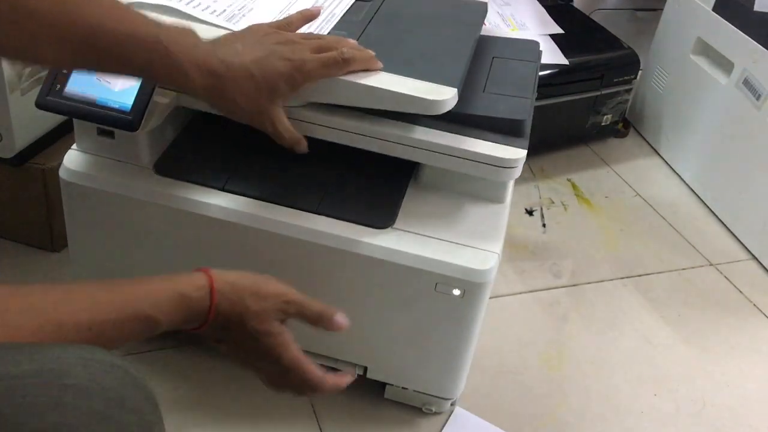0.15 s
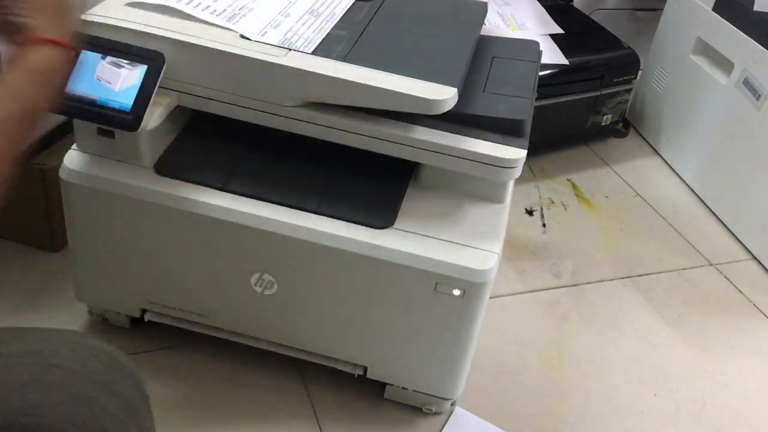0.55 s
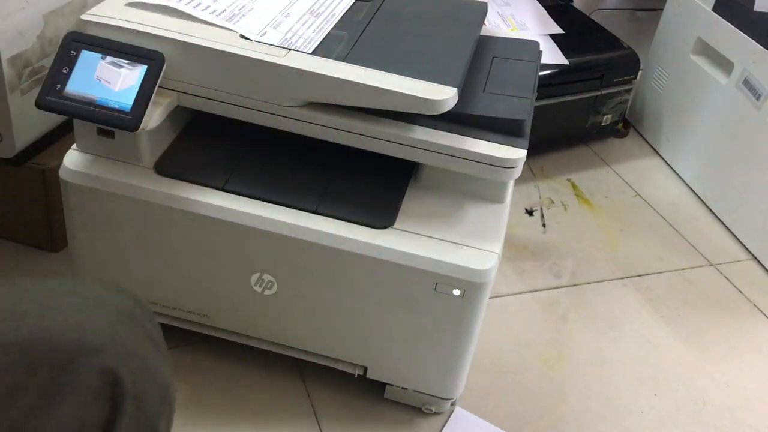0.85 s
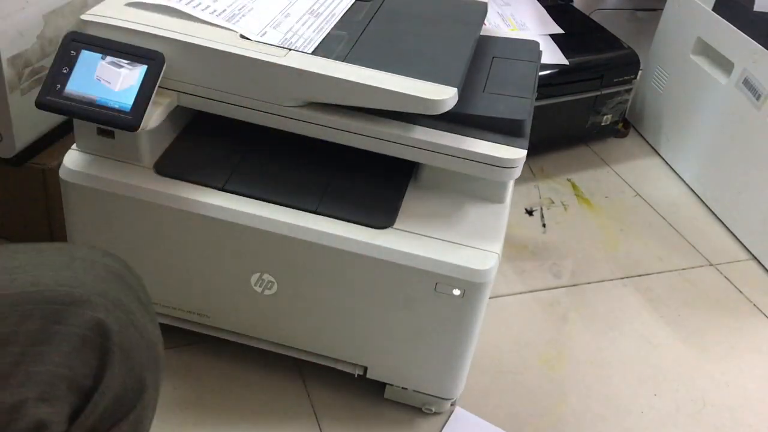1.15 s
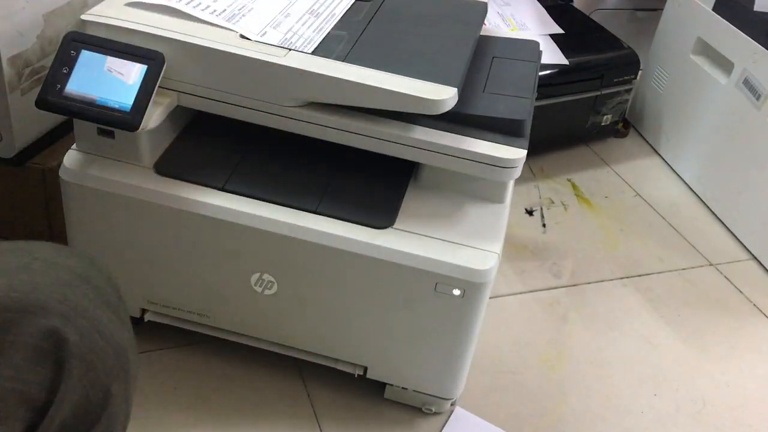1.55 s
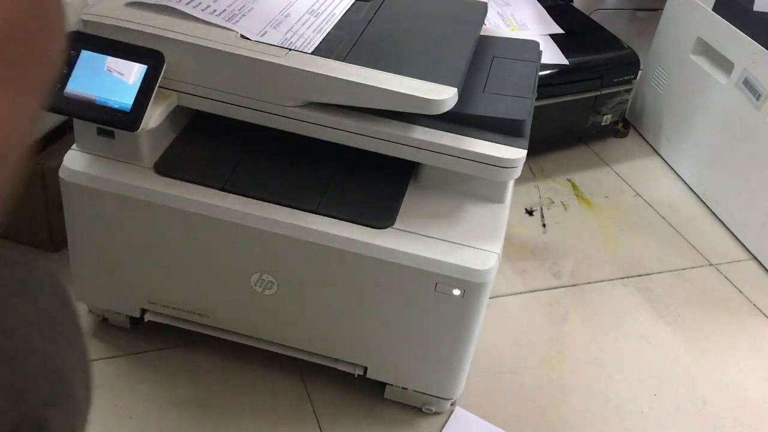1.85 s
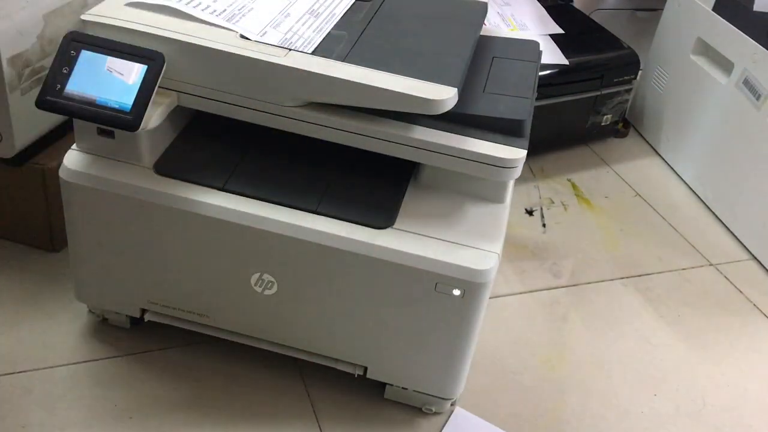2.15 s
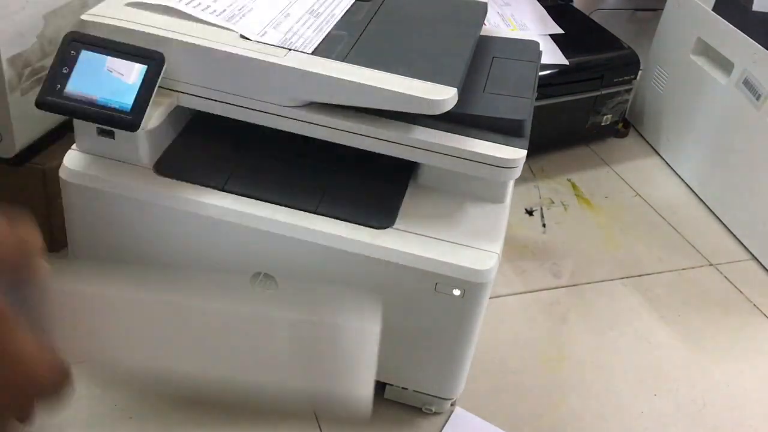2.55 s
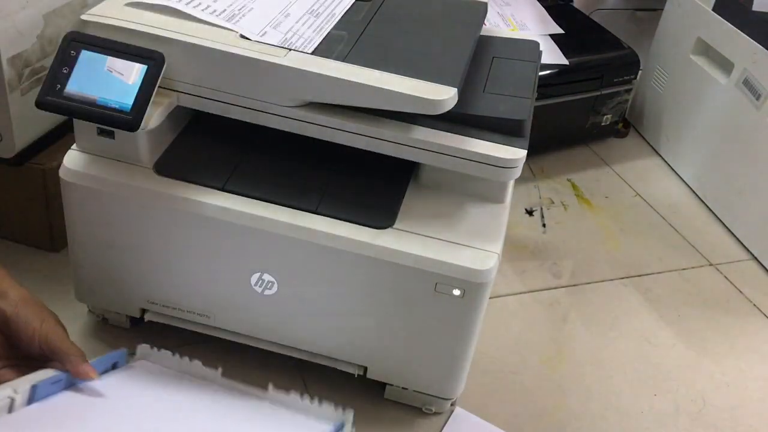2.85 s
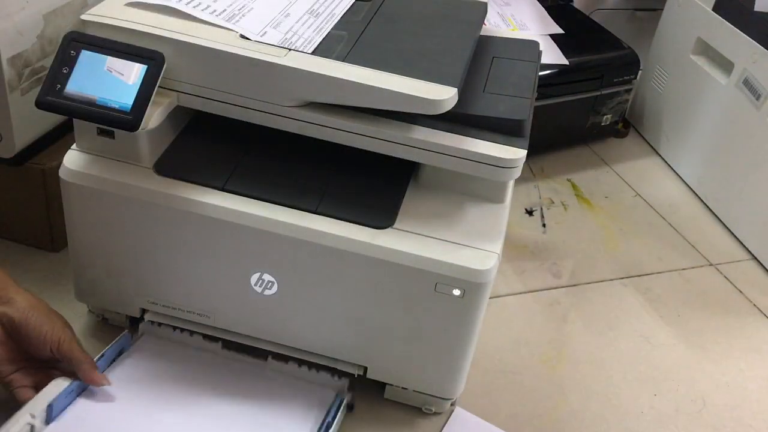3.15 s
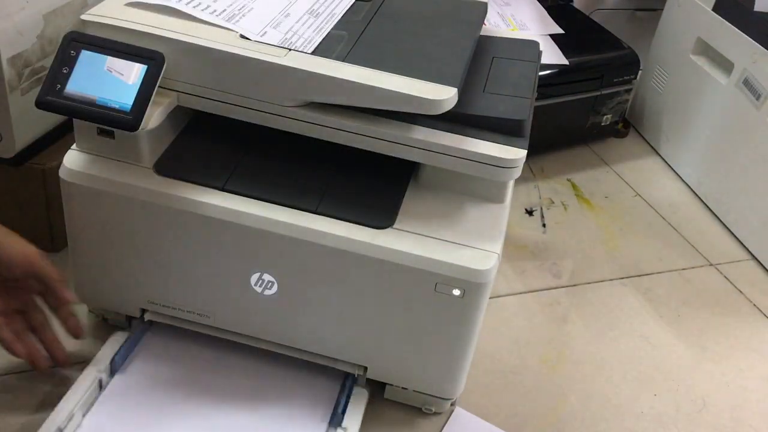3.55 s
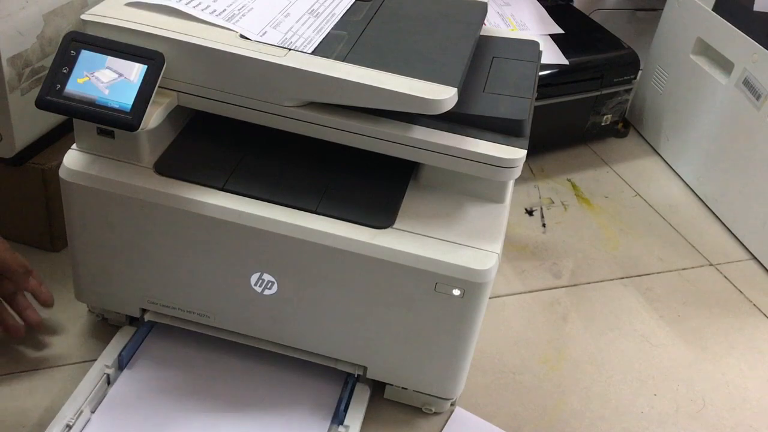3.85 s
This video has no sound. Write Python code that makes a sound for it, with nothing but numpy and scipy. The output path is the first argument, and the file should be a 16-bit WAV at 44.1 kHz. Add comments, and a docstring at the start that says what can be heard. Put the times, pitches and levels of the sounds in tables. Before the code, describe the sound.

Sharp clacks and rattling as a plastic paper tray slides into an office printer.

```python
"""A plastic paper tray goes into an office printer, close to one microphone in a small, hard-floored room.
First the scanner lid drops shut. Clothes and paper rustle, and further off the tray is picked up with a
click. It clacks against the mouth of its slot, rattles and scrapes along the rails and knocks home: each
blow sets the plastic ringing, and the rubbing is a stream of tiny slips. Ventilation rumbles throughout."""
import sys
import numpy as np
from scipy import signal
from scipy.fft import rfft, irfft
from scipy.io import wavfile

SR = 44100
rng = np.random.default_rng(int(sys.argv[2]) if len(sys.argv) > 2 else 0)


def unload_audio(sound):
    """Save the sound as a 16-bit wav file, at the path given as the first command line argument."""
    columns = np.transpose(np.atleast_2d(sound))
    # keep every value between -1 and 1, then stretch to whole-number steps
    steps = np.round(np.clip(columns, -1, 1) * 32767)
    wavfile.write(sys.argv[1], SR, steps.astype(np.int16))


N = 176400
TIME = np.arange(N) / SR
HIT_TIME = TIME[:SR // 2]

# plastic parts knock together: (time [s], level [dB], body boost [dB], edge boost [dB], chatter [s],
# crack pitch [Hz], relative crack level [dB])
CONTACTS = [(0.0112, -25, -6, 4, 0.003, 2970, 11), (2.297, -42, 0, 2, 0.003, 4070, 13.5),
            (2.797, -41, 13, -10, 0.0047, 1390, 10), (2.821, -47, 7, -15, .005, 1360, 20.5),
            (2.8445, -29.5, -6, -18, 0.0027, 1660, 5), (2.9743, -6, -2, -0.5, 0.0021, 4370, 8.5),
            (3.1277, -19.5, 3.5, 4, 0.0025, 4036, 11.5), (3.221, -42.5, 13, 8, 0.0051, 1670, 15.5),
            (3.318, -30, 3, -2.5, 0.013, 1540, -11), (3.342, -31.5, 14.5, -4, 0.0052, 1520, 9),
            (3.416, -29.5, 9.5, 7, 0.0033, 1190, -1), (3.45, -27.5, 8, -11, 0.0062, 1220, 5),
            (3.467, -29, 9, 3.5, 0.0081, 1580, 12.5), (3.494, -19.5, 3.5, -3.5, 0.0068, 1640, 7.5),
            (3.539, -20, 1.5, 1, 0.0046, 1270, 6), (3.561, -29.5, 7, -9, 0.0035, 1640, 10),
            (3.623, -18, 5.5, 0, 0.0049, 1052, 8.5), (3.649, -15.5, -4.5, 4.5, 0.0016, 1250, 2),
            (3.677, -17.5, 6, -2, 0.012, 1786, -4), (3.762, -33.5, 5, 2, 0.0012, 6750, 16),
            (3.7735, -17, 3, 0.5, 0.0065, 1400, 3), (3.838, -26, 4, 16, 0.0023, 1090, 9),
            (3.8414, -7.5, -0.5, 1.5, 0.003, 3700, 11.5)]
# spectrum of brushing cloth and paper: (frequency [Hz], level [dB])
CLOTH_SPECTRUM = [(400, -2), (2500, 0), (4200, 0.5), (6500, -3.5), (12000, -8), (14500, -11), (16000, -15)]
# spectrum of gritty rubbing: (frequency [Hz], level [dB])
SCRAPE_SPECTRUM = [(180, -17), (300, -4), (801, -7), (1150, 3), (1360, -6), (1680, 0), (2100, -4),
                   (4590, -9.5), (5000, -15.5), (16000, -29.5)]


def from_db(db):
    """Decibels to gain."""
    return 10 ** (np.asarray(db) / 20)


def rms_one(x):
    """Scale to rms 1."""
    return x / np.sqrt(np.mean(x ** 2) + 1e-20)


def at_hz(points, hz):
    """Read a table on a log-frequency axis."""
    f, value = np.transpose(points)
    return np.interp(np.log(np.maximum(hz, 1)), np.log(f), value)


def level_curve(rows):
    """Gain over time from rows of (time [s], level [dB])."""
    return from_db(np.interp(TIME, *np.transpose(rows)))


def swell(s, db, half_s):
    """Bell-shaped rise and fall in level around time s."""
    return from_db(db) * np.exp(-((TIME - s) / half_s) ** 2)


def colour(x, spectrum):
    """Give a signal a spectrum; rms 1."""
    hz = np.arange(len(x) // 2 + 1) * SR / len(x)
    return rms_one(irfft(rfft(x) * from_db(at_hz(spectrum, hz)), len(x)))


def bell(x, hz, db, width=0.92):
    """Boost or cut round one frequency; width is half the bandwidth over that frequency."""
    a, w = from_db(db / 2), 2 * np.pi * hz / SR
    k = np.sin(w) * width
    return signal.lfilter([1 + k * a, -2 * np.cos(w), 1 - k * a], [1 + k / a, -2 * np.cos(w), 1 - k / a], x)


def add(out, s, sound):
    """Mix a sound in at time s."""
    i = max(int(s * SR), 0)
    out[i:i + len(sound)] += sound[:N - i]


def blow(chatter_s, t60, attack_s=0.00025):
    """Envelope of a blow: quick rise, held while the contact chatters, then ringing out."""
    rise = 1 - np.exp(-HIT_TIME / attack_s)
    return rise * from_db(-60 * np.maximum(HIT_TIME - chatter_s, 0) / t60)


def dense_ring(spectrum, chatter_s, t60):
    """Countless overlapping modes of a panel, struck together."""
    return colour(rng.standard_normal(len(HIT_TIME)), spectrum) * blow(chatter_s, t60)


def modal_ring(modes, chatter_s, spread_db):
    """Distinct modes, each struck with a strength of its own."""
    ring = 0
    for hz, db, t60 in modes:
        strength = from_db(db + spread_db * rng.standard_normal())
        ring += strength * np.sin(2 * np.pi * (hz * HIT_TIME + rng.random())) * blow(chatter_s, t60)
    return ring


def friction(spectrum, per_s, spread_db):
    """Tiny random slips of uneven size, coloured by the rubbed surface."""
    slips = (rng.random(N) < per_s / SR) * rng.choice([-1, 1], N)
    sizes = from_db(spread_db * np.minimum(rng.exponential(1, N), 4))
    return colour(slips * sizes, spectrum)


def ventilation(rumble_hz=73, width_hz=11.6):
    """Room tone: steady air noise, with a low resonant rumble that swells and sinks."""
    # spectrum of the moving air: (frequency [Hz], level [dB])
    air_spectrum = [(22, -19), (32, -14), (45, -1.5), (70, -4.5), (105, -5), (150, -9), (200, -8.5),
                    (265, -12.5), (310, -17), (390, -13.5), (500, -20.5), (1100, -19.5), (1800, -24.5),
                    (4800, -37.5), (5600, -36), (10300, -47.5), (16000, -52)]
    # course of the rumble: (time [s], level [dB])
    rumble_levels = [(0, -52), (.7, -56), (2.3, -56.5), (2.6, -58.5), (2.72, -44), (2.95, -53), (4, -57)]
    resonance = signal.iirpeak(rumble_hz, rumble_hz / width_hz, fs=SR)
    rumble = signal.lfilter(*resonance, rng.standard_normal(N + SR))[SR:]  # a second to build up
    air = from_db(-50.5) * colour(rng.standard_normal(N), air_spectrum)
    return air + level_curve(rumble_levels) * rms_one(rumble)


def scanner_lid():
    """The lid drops shut in two quick blows; the first also sets its distinct modes ringing."""
    # the lid lands and settles: (time [s], level [dB])
    hits = [(0.0, -23), (.011, -25)]
    # its mass of overlapping modes: (frequency [Hz], level [dB])
    spectrum = [(30, -16), (72, -6), (130, -10), (220, -2.5), (300, -4.5), (400, 2.5), (650, -2.5),
                (1100, -2.5), (1900, -5), (3100, -6.5), (4500, -14), (8000, -21.5), (13500, -29.5),
                (16000, -39)]
    # its distinct modes: (frequency [Hz], level [dB], t60 [s])
    modes = [(74.5, -0.5, 0.46), (121, -4, 0.21), (408, 7.5, .14), (866, -5, 0.15), (1151, -3, .1)]
    out = np.zeros(N)
    for s, db in hits:
        add(out, s, from_db(db) * dense_ring(spectrum, chatter_s=0.0013, t60=0.16))
    s, db = hits[0]
    add(out, s, from_db(db - 10.5) * modal_ring(modes, chatter_s=0.01, spread_db=3.5))
    return out


def rustle():
    """Sleeves, trousers and paper brush in a dense stream of slips."""
    # course of the brushing: (time [s], level [dB])
    levels = [(0, -58), (.25, -65.5), (.55, -68), (.61, -58.5), (.74, -74), (1.05, -77), (1.11, -66.5),
              (1.25, -66), (1.38, -54.5), (1.5, -68), (1.9, -73), (2.15, -63.5), (2.215, -47.5),
              (2.35, -56), (2.48, -51), (2.63, -53.5), (2.77, -60), (4, -56.5)]
    return level_curve(levels) * friction(CLOTH_SPECTRUM, per_s=12000, spread_db=4)


def clacks(mode_shift=0.017):
    """The plastic rings at every contact; flat contacts have more body, corners more edge."""
    # the tray's longest-ringing modes: (frequency [Hz], level [dB], t60 [s])
    tray_modes = [(680, -9.5, 0.13), (980, -10.5, 0.095), (1207, -9, 0.15), (1490, -4, 0.13),
                  (1686, -18, 0.08), (1930, -6, 0.1), (2370, -26, 0.089), (2960, -1, 0.06),
                  (4070, 2, 0.037), (4570, -19, 0.036)]
    # its mass of short-lived modes: (frequency [Hz], level [dB])
    spectrum = [(100, -32), (300, -18.5), (600, -9), (1100, -3.5), (1700, -1), (2300, -2.5), (4400, -3.5),
                (5200, -4.5), (8000, -11), (11500, -17.5), (16000, -25.5)]
    out = np.zeros(N)
    for s, db, body_db, edge_db, chatter_s, _, _ in CONTACTS:
        # the modes wander as grip and support change
        modes = [(hz * (1 + mode_shift * rng.standard_normal()), mode_db, t60)
                 for hz, mode_db, t60 in tray_modes]
        clatter = from_db(-6.5) * dense_ring(spectrum, chatter_s, t60=0.06)
        ring = from_db(-17) * modal_ring(modes, chatter_s / 2, spread_db=1)
        with_body = bell(clatter + ring, hz=800, db=body_db)
        add(out, s, from_db(db) * bell(with_body, hz=11400, db=edge_db))
    return out


def cracks(width=0.15):
    """Each contact opens with a crack: the struck spot's own damped resonance, jostled by the chatter."""
    out = np.zeros(N)
    for s, db, _, _, chatter_s, hz, crack_db in CONTACTS:
        # a random walk of the phase widens the tone to a band of width * hz
        jostle = np.cumsum(rng.standard_normal(len(HIT_TIME))) * np.sqrt(np.pi * width * hz / SR)
        buzz = np.sin(2 * np.pi * hz * HIT_TIME + jostle) * blow(chatter_s, t60=0.015)
        crack = signal.lfilter(*signal.iirpeak(hz, Q=2, fs=SR), buzz)
        add(out, s, from_db(db + crack_db - 12) * crack)
    return out


def ticks():
    """Paper and clothing give light, bright ticks that die at once."""
    # single ticks: (time [s], level [dB])
    hits = [(.561, -47.5), (1.095, -55), (1.219, -57), (1.441, -49.5), (2.129, -53.5)]
    out = np.zeros(N)
    for s, db in hits:
        add(out, s, from_db(db) * dense_ring(CLOTH_SPECTRUM, chatter_s=0.00036, t60=0.04))
    return out


def scuffs():
    """Hands and shoes scuff softly: short, gritty swells of friction."""
    # single scuffs: (time [s], level [dB], half length [s])
    strokes = [(1.296, -52.5, 0.021), (1.403, -52, 0.027), (2.702, -51, 0.0099)]
    return sum(swell(*row) for row in strokes) * friction(SCRAPE_SPECTRUM, per_s=1400, spread_db=2)


def tray_pickup(at_s=1.6025, rise_s=0.0088):
    """The tray clicks as it is lifted, further from the microphone: a soft onset and little treble."""
    # spectrum of the distant click: (frequency [Hz], level [dB])
    spectrum = [(100, -17), (500, -7.5), (1600, -0.5), (2200, -3), (3100, 4), (5000, -9), (10000, -22.5),
                (16000, -25)]
    out = np.zeros(N)
    onset = np.minimum(HIT_TIME / rise_s, 1)
    add(out, at_s, from_db(-29.5) * onset * dense_ring(spectrum, chatter_s=0, t60=0.097))
    return out


def paper_swish():
    """The paper gives one high swish as the tray swings round."""
    # spectrum of the swish: (frequency [Hz], level [dB])
    spectrum = [(5000, -20), (9000, 0), (13000, -2), (16000, -9)]
    return swell(s=2.52, db=-55, half_s=0.15) * colour(rng.standard_normal(N), spectrum)


def tray_scrape():
    """The tray rubs on floor and rails in sparse, gritty slips."""
    # course of the rubbing: (time [s], level [dB])
    levels = [(2.62, -90), (2.73, -58), (2.83, -52.5), (2.86, -42.5), (2.97, -53), (3.08, -69),
              (3.2, -42.5), (3.29, -58.5), (3.38, -44), (3.44, -43.5), (3.51, -30.5), (3.6, -46.5),
              (3.665, -29), (3.73, -45), (3.81, -45), (3.93, -67), (4, -77)]
    return level_curve(levels) * friction(SCRAPE_SPECTRUM, per_s=1100, spread_db=0.5)


def rail_glide():
    """Plastic glides on the rails, its slips so dense that they merge into a hiss."""
    # course of the glide: (time [s], level [dB])
    levels = [(3.28, -91), (3.35, -55.5), (3.52, -47), (3.68, -51), (3.74, -64), (3.9, -80)]
    # spectrum of the hiss: (frequency [Hz], level [dB])
    spectrum = [(2000, -15), (4900, -15), (5700, 5), (6700, -10), (11500, -13), (16000, -16)]
    return level_curve(levels) * friction(spectrum, per_s=12000, spread_db=6.5)


def casing_thumps():
    """The tray's weight drops on the rails and the printer's body answers with dull thumps."""
    # drops on the rails: (time [s], level [dB])
    drops = [(3.424, -31.5), (3.49, -40), (3.627, -35.5), (3.679, -28), (3.843, -46)]
    # low modes of the casing: (frequency [Hz], level [dB], t60 [s])
    modes = [(122, -1.5, 0.18), (169, -7, 0.11), (202, 3, 0.14), (271, -2, 0.13)]
    out = np.zeros(N)
    for s, db in drops:
        add(out, s, from_db(db) * modal_ring(modes, chatter_s=0.0051, spread_db=3) / 2)
    return out


def near_echoes(x, t60=0.11, build_s=0.012):
    """A quick scatter of reflections from the floor and furniture."""
    envelope = from_db(-60 * HIT_TIME / t60) * np.minimum(HIT_TIME / build_s, 1) ** 2
    response = rng.standard_normal(len(HIT_TIME)) * envelope
    return signal.fftconvolve(x, response / np.sqrt(np.sum(response ** 2)))[:N]


def room(x, build_s=0.0027):
    """Diffuse reverberation of the small room; the treble dies first."""
    # reverberation time: (frequency [Hz], t60 [s])
    decay_times = [(100, 0.61), (1000, 0.54), (4000, 0.44), (14000, 0.27)]
    t, response = TIME[:SR], 0
    edges_hz = np.geomspace(50, 17000, 10)
    for low, high in zip(edges_hz, edges_hz[1:]):
        bandpass = signal.butter(2, [low, high], "band", fs=SR, output="sos")
        band = signal.sosfilt(bandpass, rng.standard_normal(SR))
        response += band * from_db(-60 * t / at_hz(decay_times, np.sqrt(low * high)))
    response *= 1 - np.exp(-t / build_s)
    return signal.fftconvolve(x, response / np.sqrt(np.sum(response ** 2)))[:N]


def scene():
    """At the microphone: blows and friction, direct and off the room, over the ventilation."""
    blows = scanner_lid() + clacks() + ticks() + tray_pickup() + casing_thumps()
    rubbing = rustle() + scuffs() + paper_swish() + tray_scrape() + rail_glide()
    snaps = cracks()
    direct = blows + rubbing + snaps
    into_room = blows + rubbing + from_db(-14) * snaps  # cracks radiate mainly straight ahead
    reflections = from_db(-13) * near_echoes(into_room) + from_db(-15) * room(into_room)
    return (direct + reflections + ventilation())[None]


def record(dry):
    """The recorder rounds the peaks and cuts the top treble steeply."""
    cutoff_hz = 15900
    lowpass = signal.ellip(10, .1, 70, cutoff_hz, fs=SR, output="sos")
    return signal.sosfilt(lowpass, np.tanh(dry))


dry = scene()
out = record(dry)
unload_audio(out)
```